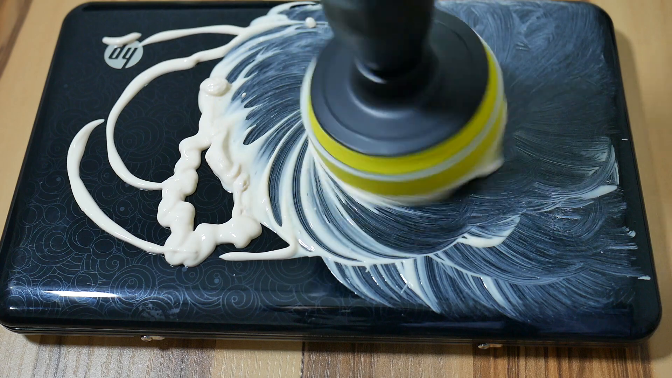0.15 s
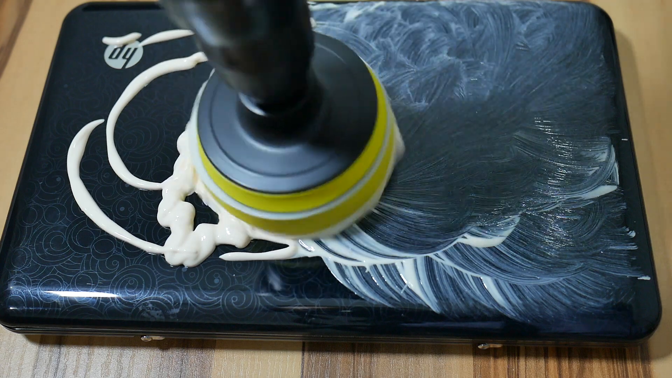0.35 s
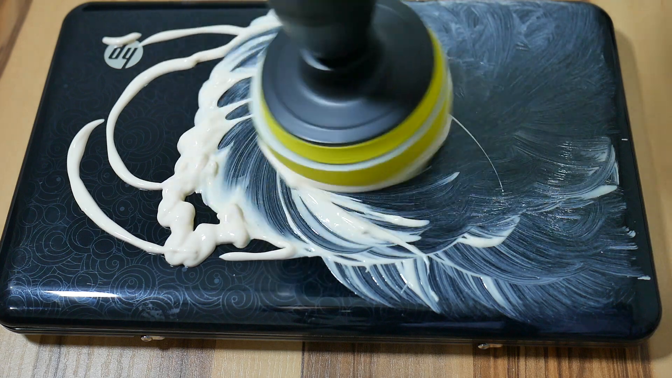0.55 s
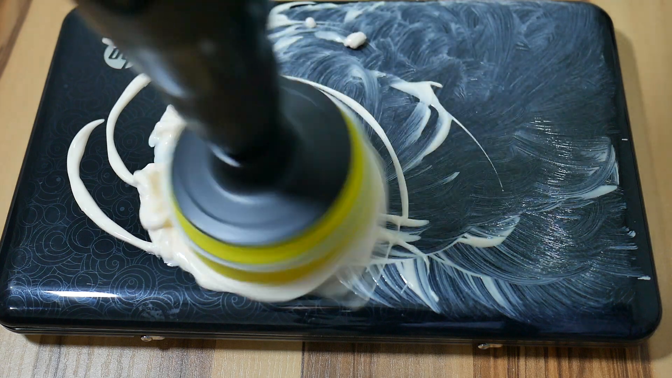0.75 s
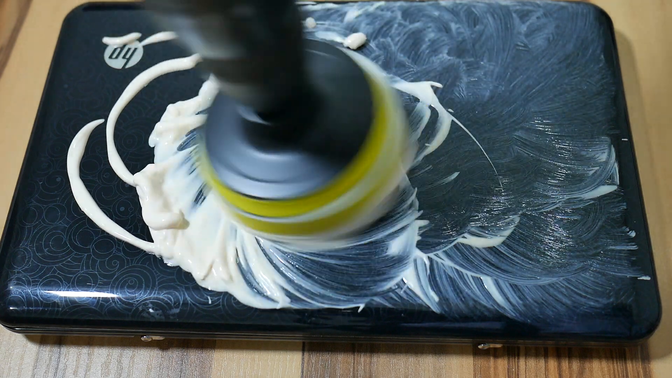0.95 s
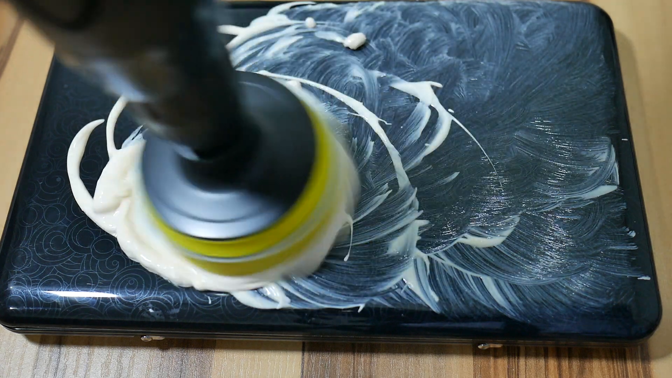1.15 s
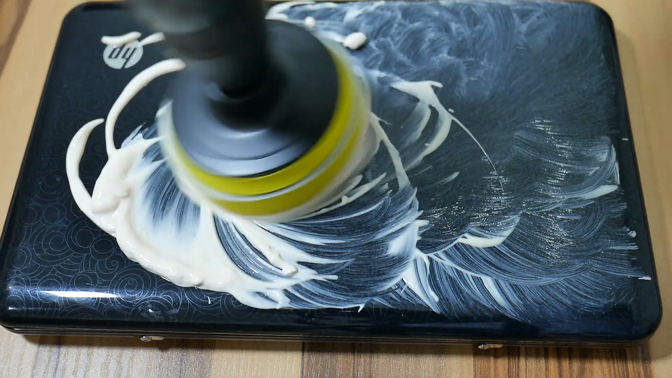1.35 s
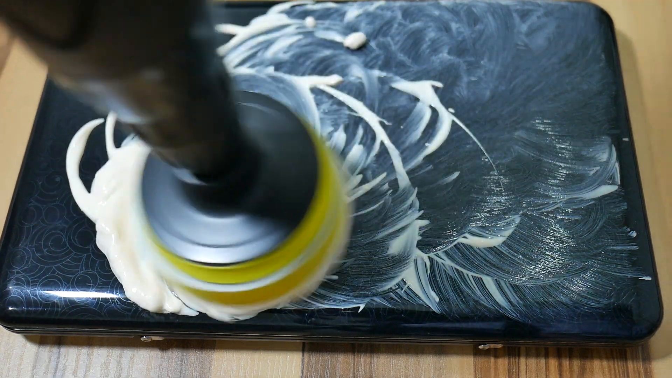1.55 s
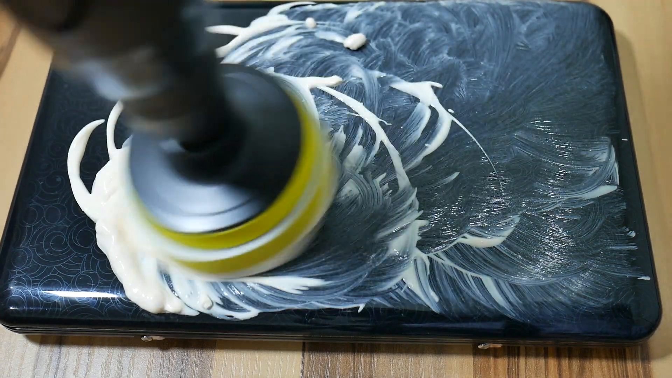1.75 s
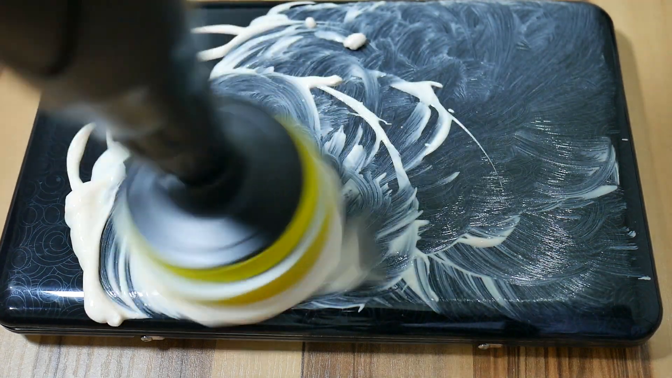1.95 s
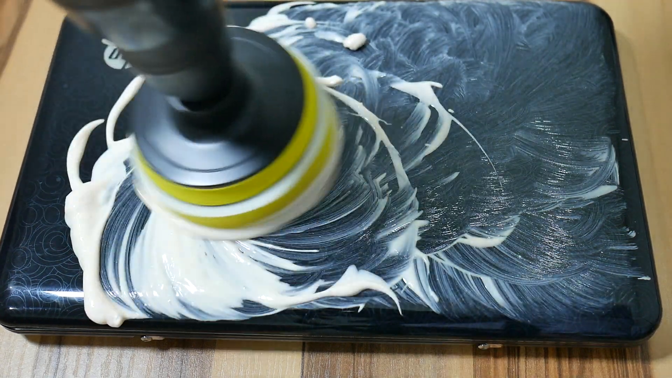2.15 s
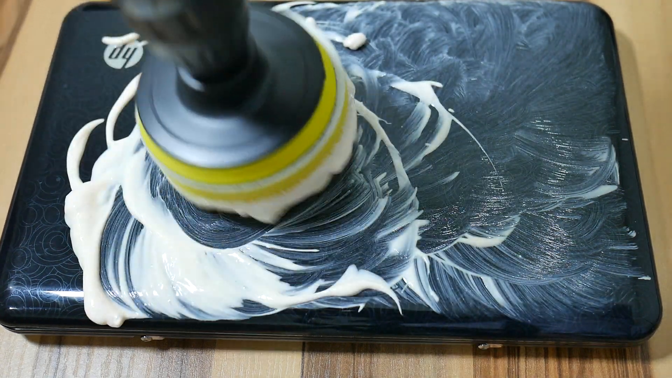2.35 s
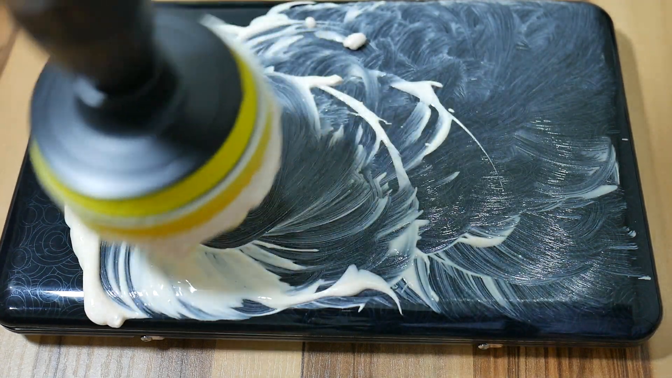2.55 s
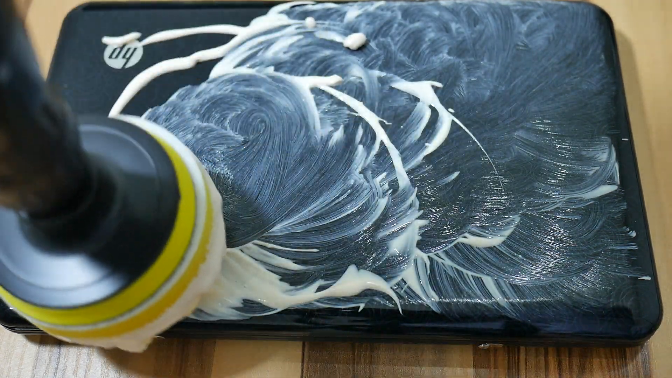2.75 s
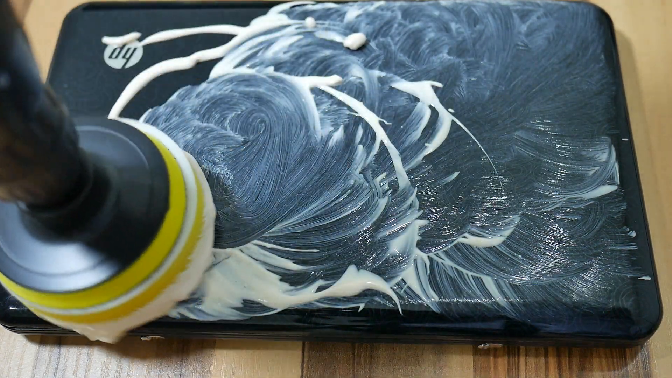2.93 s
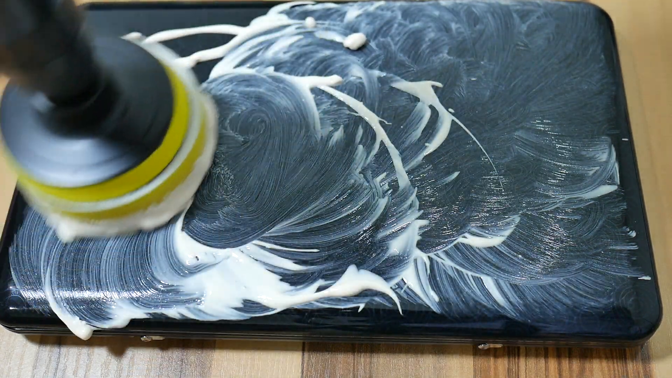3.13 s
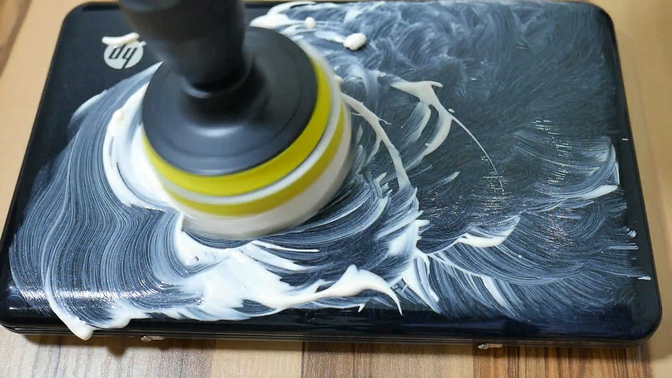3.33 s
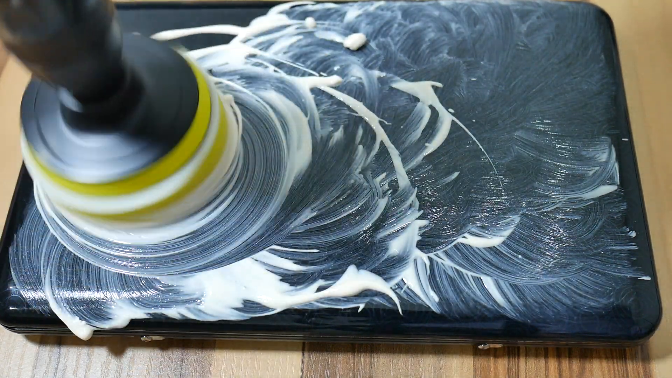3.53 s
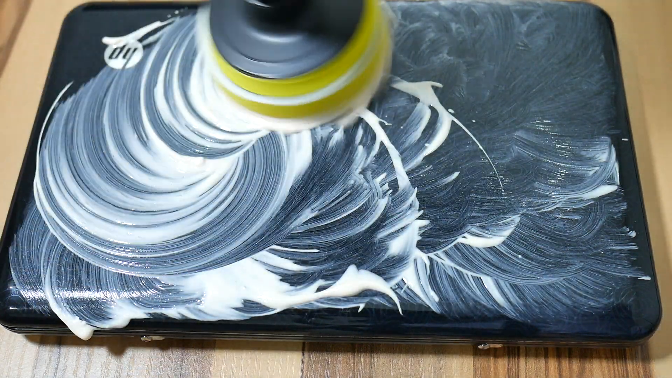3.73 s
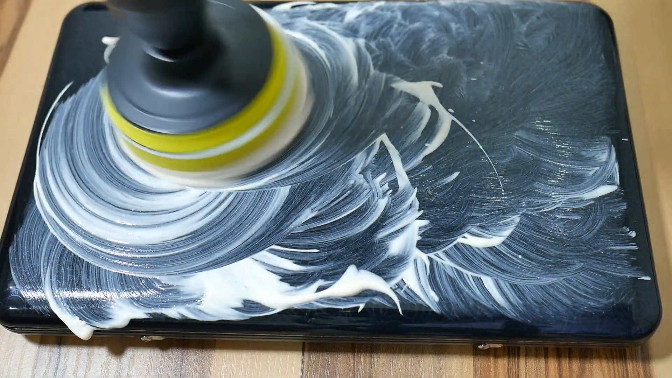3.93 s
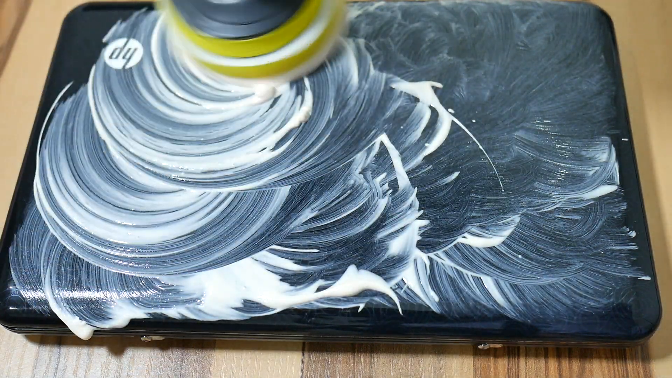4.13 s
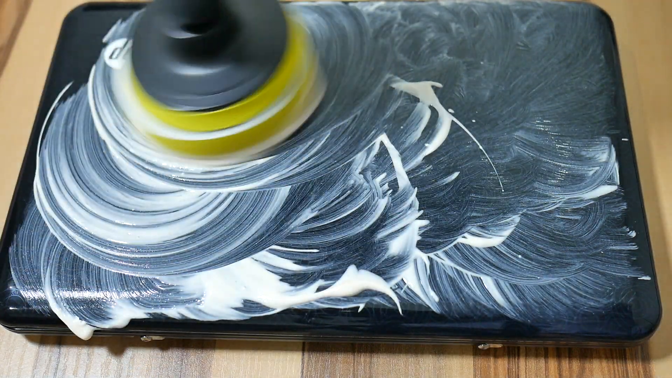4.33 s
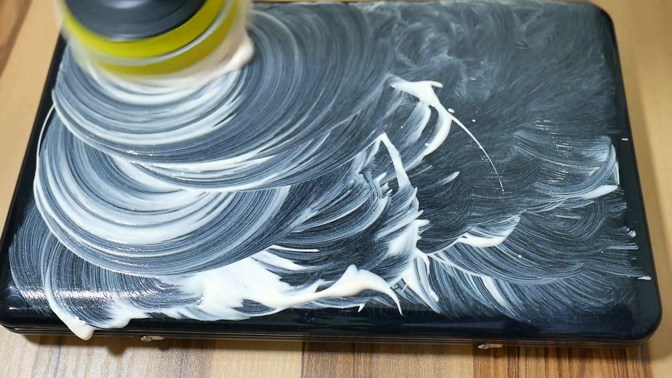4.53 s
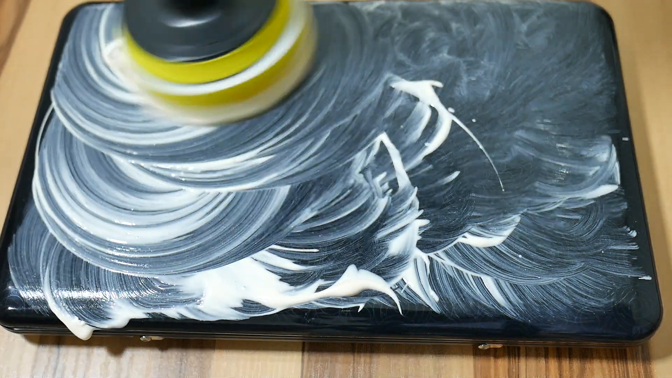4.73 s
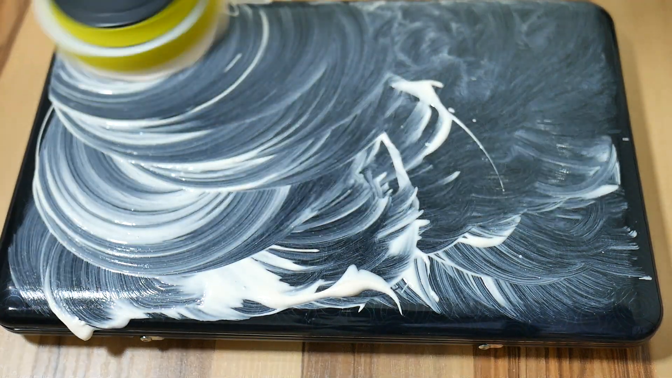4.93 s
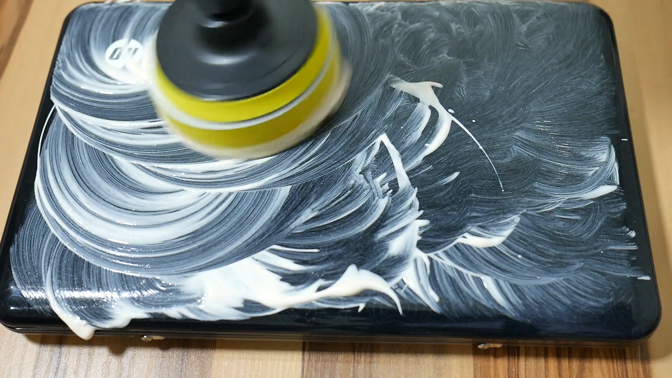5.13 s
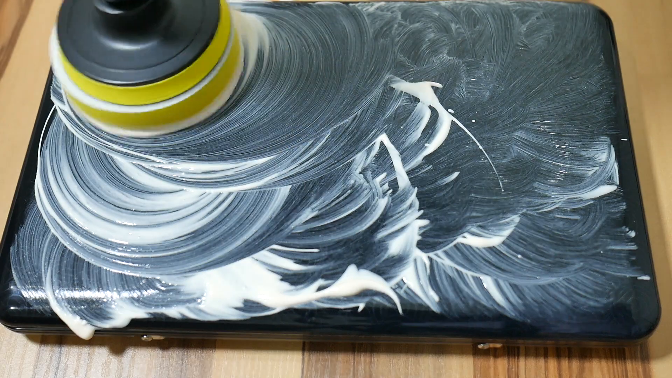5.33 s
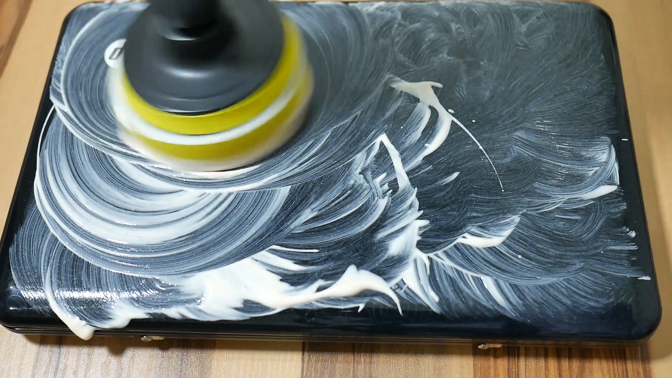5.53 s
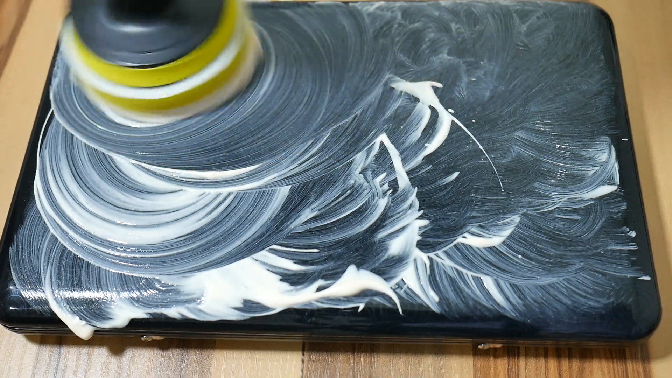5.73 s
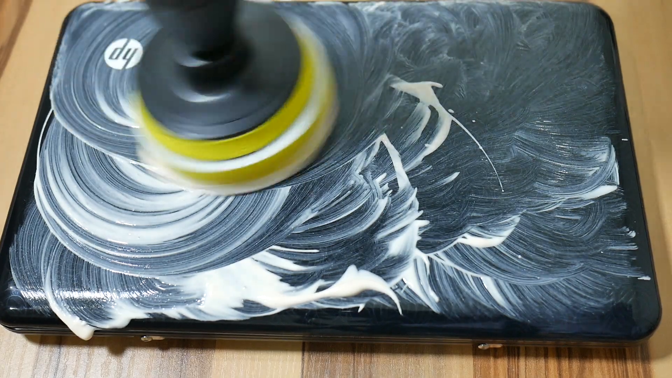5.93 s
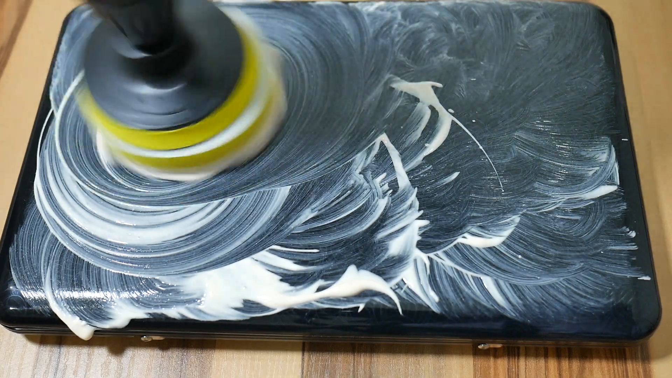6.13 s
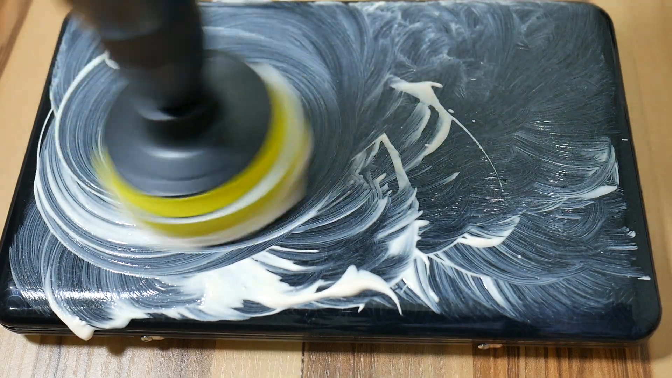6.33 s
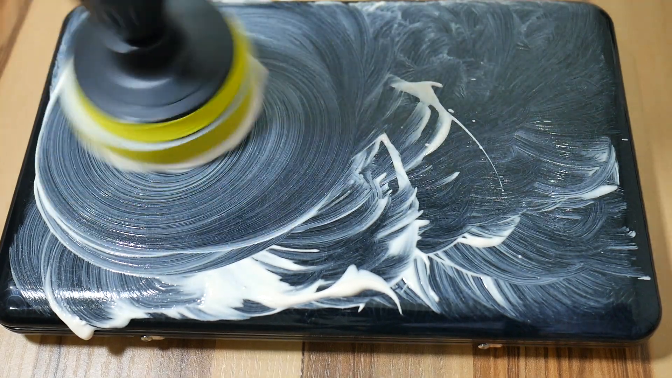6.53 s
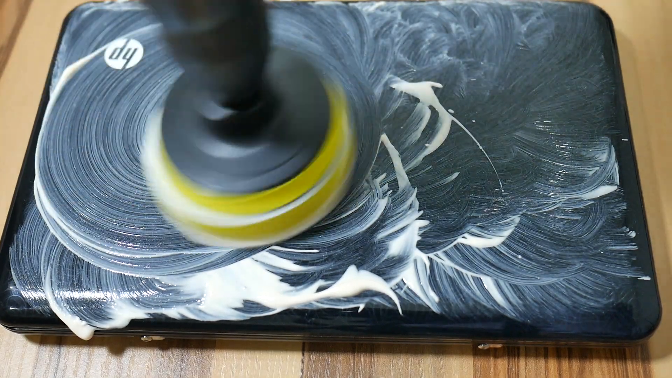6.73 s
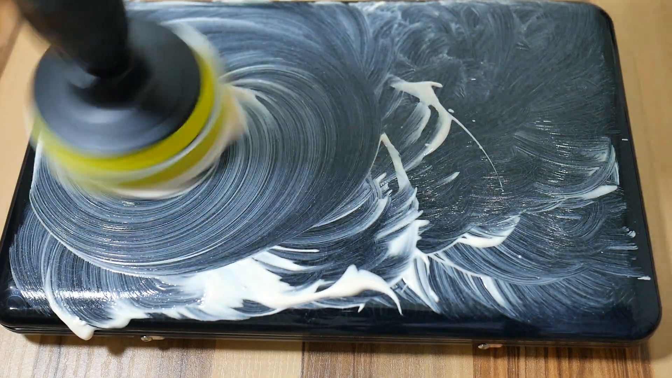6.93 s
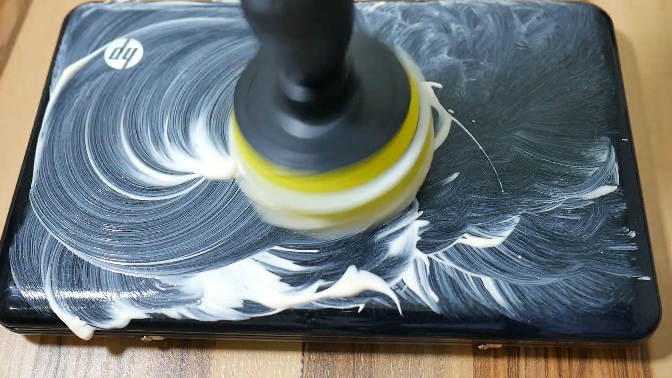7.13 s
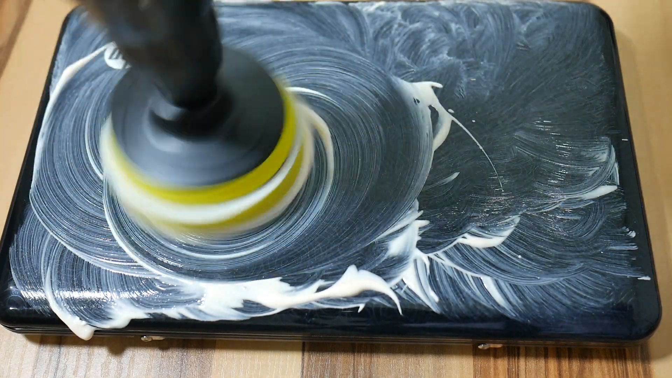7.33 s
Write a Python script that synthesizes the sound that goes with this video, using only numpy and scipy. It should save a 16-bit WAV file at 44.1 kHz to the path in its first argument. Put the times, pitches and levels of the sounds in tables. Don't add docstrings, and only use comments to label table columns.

```python
import sys
import numpy as np
from scipy import signal
from scipy.fft import rfft, irfft, next_fast_len
from scipy.io import wavfile
from scipy.ndimage import uniform_filter1d

SR = 44100
rng = np.random.default_rng(int(sys.argv[2]) if len(sys.argv) > 2 else 0)


def gain_from_db(level_db):
    decades = np.asarray(level_db, float) / 20
    return 10 ** decades


def log_audio(samples):
    frames = np.atleast_2d(samples).T
    limited = np.clip(frames, -1, 1)
    pcm = np.round(limited * 32767).astype(np.int16)
    wavfile.write(sys.argv[1], SR, pcm)


N = 329868
TIME = np.arange(N) / SR
CARRIER, ROTOR = 0.046, 0.26
REGRIP_S = 2.8

# start_s, tooth_rate_hz, lag_s, grind_db
TRIGGER_MOVES = [(0, 969.3, 0.11, -36.5), (.182, 790, .02, -40.5), (.23, 746.3, 0.048, -38),
                 (.576, 967, .025, -36), (.98, 837.7, 0.023, -37.5), (1.04, 738.3, 0.093, -35.5),
                 (2.24, 550, 0.036, -36.5), (2.364, 299, 0.039, -49), (2.445, 229.5, 0.18, -88),
                 (2.965, 219.6, 0.019, -53.5), (3.1, 205.6, 0.074, -78), (3.222, 300.3, 0.022, -45),
                 (3.25, 320.8, 0.024, -36.5), (3.268, 600.8, .03, -28.5), (3.29, 1120, .028, -30.5),
                 (3.4, 1095, 0.059, -30.5), (3.8, 1082, 0.19, -31.5), (4.5, 1081, 0.066, -34.5),
                 (5.125, 957.6, 0.047, -34), (5.2, 740, 0.037, -39.5), (6.445, 537, .025, -37),
                 (6.703, 947, 0.03, -33.5), (6.805, 1056, .022, -37.5), (7.0, 1084, 0.048, -38),
                 (7.24, 1042, 0.04, -38.5), (7.3, 928, 0.032, -36)]
# centre_s, grind_gain_db, half_length_s
LEANS = [(0.225, 3, 0.041), (0.447, 2.5, 0.084), (0.605, 3, 0.053), (1.101, 2.5, 0.087),
         (1.265, -2.5, 0.05), (1.61, 1.5, 0.076), (1.878, 3, 0.1), (2.224, 4, 0.065), (2.437, 6, 0.0092),
         (3.091, 5, 0.022), (3.309, 6, 0.04), (3.609, 1.5, 0.094), (4.4, 1.5, .12), (4.88, 2, 0.075),
         (5.229, 5, 0.029), (5.38, 5.5, 0.12), (5.679, 5.5, .12), (6.123, 5.5, 0.15), (6.375, 3.5, 0.069),
         (6.472, 5, 0.045), (6.888, 3.5, 0.096), (7.3, 3.5, 0.064)]
# start_s, second_db, third_db, fourth_db, higher_db
MESH = [(0, -2.5, -6, -2.5, -1), (.168, -7, -2, -26, -1), (.2, -16.5, 5.5, -7, -0.5),
        (.26, -12.5, -1, -4, -2.5), (.575, -10, -9, -11, -5.5), (.64, -6.5, -11, -2.5, 0),
        (.85, -5.5, -10.5, -8, -3), (.995, -20, -0.5, -10, -3.5), (1.24, -15.5, -2, -12, -7.5),
        (1.66, -15, -8, -8.5, -7.5), (1.98, -9, -3, -17.5, -4), (2.215, -39, -32, -9, -35),
        (2.39, -38, -36.5, -39, -48), (3.26, -6, -10, -20, -30), (3.303, -4, -19, -13, -23),
        (3.369, -16, -9, -5, -22), (3.48, -5.5, -6, -3, -19), (4.6, -6, -6, -28.5, -15),
        (4.96, -1.5, -14, -19, -6), (5.129, -3.5, -26.5, -24, -1.5), (5.205, -6, 1, -9, -23),
        (5.28, -12, -10.5, -5.5, -12), (6.435, -26, -22, -19, -7.5), (6.52, -21, -21, -7, -4),
        (6.72, -8, -21, -18, -6), (6.845, -6, 1.5, -3, -7), (7.125, 3, -6, -5, -20),
        (7.23, -8, 0.5, -7, -13), (7.305, -16, -13, 0, -14), (7.39, -9, -5, -6, -15)]
# multiple_of_tooth_rate, level_db, sideband_depth_0_to_1
TEETH = [
    [(2, 0, 0.54)],
    [(3, 0, 0.3)],
    [(3.82, -9.5, 0), (4, -14, 1)],
    [(5, 4, 0.34), (6, 2, 0.5), (7, -1, 0.3), (8, -3, 0.56)],
]
# centre_hz, width_hz, level_db
FIRST_GRIP = [(1322, 53, -18.5), (2100, 70, 6.5), (2250, 120, 5), (2940, 160, -22), (4090, 210, 9.5),
              (4360, 314, -25), (4940, 510, 5.5), (5300, 200, -8), (7100, 1600, -8)]
# centre_hz, width_hz, level_db
SECOND_GRIP = [(1305.7, 200, -3), (1769.3, 200, 5.5), (2049.3, 200, 7.5), (2870, 600, -2), (3400, 370, 1),
               (3418, 192, 0), (4150, 380, 3.5), (4220, 330, 3.5), (5470, 820, 7.5), (7260, 349, 8)]
# frequency_hz, level_db
GRIND_SPECTRUM = [(130, -71.5), (220, -25.5), (340, -17), (491, -17.5), (581, -9), (642, -21.5), (698, -10),
                  (1250, -9.5), (2180, -4), (2490, 0), (4250, -4), (6250, -9.5), (12000, -32.5),
                  (15600, -47), (22000, -120)]
# frequency_hz, level_db_per_hz
HISS_SPECTRUM = [(2940, -55.5), (5000, -11), (7380, -3.5), (8740, -10.5), (12200, -8.5), (15100, -2.5),
                 (15800, -2.5)]
# centre_hz, width_hz, level_db
COWL = [(6000, 1800, 4.5), (7170, 1000, 0), (8550, 1900, 6.5), (9570, 500, 1), (10600, 1000, 6),
        (11730, 780, 3.5), (13400, 1800, 1)]
# multiple_of_tooth_rate, level_db
SHAFTS = [(.322, -26.5), (.523, -32), (.805, -26), (1.026, -22), (1.33, -24), (1.61, -22), (2.67, -46),
          (3.58, -11), (7.62, -19), (11.2, -27)]
# start_s, end_s, multiple_of_tooth_rate,
# over_grind_db
SINGS = [(0.435, 0.547, .805, -13.5), (0.954, 1.066, 5, -7.5), (6.845, 7.319, 4, 1.5), (1.0, 1.125, 3, 2),
         (1.0, 1.086, 4, -5), (1.068, 1.15, 6, -5), (1.09, 1.196, 2, -10), (1.147, 1.222, 3, -2),
         (1.905, 2.256, 2, -16.5), (2.148, 2.279, 3.58, -18.5), (6.882, 7.5, .954, -15),
         (2.215, 2.281, 3, -5), (2.278, 2.332, 4, 0), (2.28, 2.36, 3, -5), (3.274, 3.308, 4, -1),
         (3.31, 3.376, 2, -5), (3.318, 3.335, 4, -2), (3.336, 3.416, 3.82, 0), (5.2, 5.281, 3, -17),
         (5.453, 5.62, 2, -4.5), (5.599, 5.696, 3, 0), (5.88, 6.074, 2, -5), (6.108, 6.251, 6, 2.5),
         (6.25, 6.441, 2, -7), (6.299, 6.457, 4, 1.5), (6.428, 6.458, 4.9, 2), (6.452, 6.477, 4, 1),
         (6.49, 6.711, 3, -7.5), (6.557, 6.629, 3.55, 3), (6.56, 6.62, 3.8, -2), (6.565, 6.69, 6, -1),
         (6.557, 6.624, 7.63, 3), (6.56, 6.686, 8, -3), (6.727, 6.86, 2, -1), (6.739, 6.81, 4, -6),
         (6.798, 6.857, 3.58, -2), (6.849, 7.197, 3, -5), (3.306, 3.33, .954, -0.5),
         (6.72, 6.897, .954, -18), (3.739, 3.947, 3, -6), (4.33, 4.619, 3, -3.5), (4.781, 4.957, 3, 1.5),
         (3.549, 4.61, 4, -14), (5.3, 5.49, 6, -7), (5.302, 5.488, 4, -1), (5.57, 5.807, 3.82, 2),
         (5.572, 5.8, 5, -3.5), (5.6, 5.819, 6, 0), (5.969, 6.267, 3.82, 2), (6, 6.269, 5, -3),
         (0.266, .3, 7, -10), (.34, 0.435, 7, -4), (1.203, 2.2, .805, -19), (1.3, 1.56, 7, -6),
         (1.731, 2.202, 7, -3.5), (3.45, 5.15, .322, -32.5), (3.45, 5.1, .523, -29.5),
         (4.601, 5.101, 3.58, -15), (4.649, 5.1, 5, -9), (5.28, 5.499, 5, -2), (5.28, 5.34, 7, 0),
         (5.582, 5.722, 7, -6), (1.247, 1.75, 3, -6), (5.557, 5.8, 4.9, -5.5), (5.6, 5.78, 4, -4.5),
         (5.8, 5.98, 4, -6), (5.9, 6.45, 5, -7.5), (6.02, 6.199, 7, -5), (6.083, 6.25, 4.9, -5.5),
         (6.23, 6.42, 3, -6), (6.848, 6.931, 3, 1), (7.4, 7.493, 2, -4), (6.8, 7.0, .523, -20.5),
         (7.001, 7.3, 3.58, -4), (7.126, 7.23, 2, -18), (7.3, 7.498, 5, -3), (7.339, 7.5, 3.58, -4)]
# start_s, end_s, centre_hz, width_hz, over_grind_db
VENTS = [(0.01, .2, 7600, 300, -20), (0.574, 1.03, 7540, 300, -18), (0.591, 0.998, 6780, 120, -26),
         (.58, .76, 10600, 2200, -15), (0.907, 1.048, 10800, 1800, -13), (1.054, 1.36, 6900, 120, -17),
         (1.36, 1.45, 10000, 3000, -14), (1.599, 2.298, 6705, 100, -17), (1.72, 1.92, 10490, 2500, -19.5),
         (1.302, 2.28, 5600, 250.2, -17.5), (3.452, 5.12, 8200, 140.6, -23), (3.45, 4.45, 12300, 450, -16),
         (3.505, 4.45, 9500, 499.6, -19.5), (4.398, 5.4, 7237, 299, -15.5),
         (4.604, 5.15, 12700, 400.2, -19), (4.503, 5.2, 9600, 1800, -14), (5.302, 5.45, 9900, 498, -18),
         (5.547, 5.716, 7260, 229.8, -14.5), (5.558, 5.66, 9500, 80, -15), (5.59, 5.75, 10700, 699.5, -15),
         (5.98, 6.12, 10000, 2000, -14), (5.994, 6.5, 7270, 249.8, -20), (6.35, 6.458, 10500, 1202, -15),
         (6.747, 7.12, 7430, 90, -17), (6.74, 6.9, 10500, 2507, -13), (6.816, 7.3, 12000, 350, -14),
         (7.198, 7.4, 10400, 1502, -15)]
# start_s, peak_db, low_hz, high_hz, t60_s
CLICKS = [(.965, -48, 279.5, 420, .12), (2.345, -49, 200, 709, 0.031), (2.46, -46, 499.6, 1290, .02),
          (2.426, -45, 1000, 13080, 0.016), (2.434, -34, 897, 5430, 0.034),
          (2.437, -32.5, 895, 12600, 0.035), (2.443, -47, 900, 5400, .03), (2.498, -43, 1107, 2200, 0.018),
          (2.835, -77, 890, 4000, .015), (2.855, -64, 706, 2510, 0.017), (2.891, -40.5, 600, 12100, 0.014),
          (2.933, -41, 2180, 6000, 0.018), (2.938, -39, 1490, 6160, 0.012), (2.945, -47, 1480, 5470, .015),
          (2.975, -43.5, 700, 2500, 0.029), (2.995, -41, 985, 7000, 0.0055), (3.044, -41, 890, 6000, 0.017),
          (3.074, -54, 894, 6000, 0.021), (3.087, -41, 877, 11960, 0.0099),
          (3.159, -41.5, 704, 3440, 0.014), (3.1605, -55, 3005, 15000, 0.0068),
          (3.2321, -32, 897, 5470, 0.015), (3.2461, -32, 900, 9090, 0.013), (3.254, -54, 1213, 4800, .04)]
# start_s, end_s
CHOPPER = [
    (2.976, 3.095),
    (3.234, 3.25),
]
# pitch_hz, level_db
CREEP_RINGS = [(1028, -60.5), (1750, -66), (2024, -61), (2762, -65), (4048, -65), (4404, -67), (5421, -71)]
# frequency_hz, level_db_per_hz
FLOOR_SPECTRUM = [(15, -64), (25, -35), (50, -17), (79, -23), (118, -11), (176, -17), (415, -14.5),
                  (450, -21), (529, -18), (1400, -31.5), (4000, -37), (7000, -37), (11000, -38.5),
                  (15000, -52.5)]
# pitch_hz, level_db
HUM = [(55, -100.5), (119.5, -79.5), (452, -86), (888, -93)]
# time_s, left_over_right_db
PAN = [
    (0.0, -0.5),
    (1.48, 1.5),
    (5.31, 0),
    (6.9, 0),
    (7.48, -1),
]
# frequency_hz, likeness_0_to_1
LIKENESS = [(30, 0.3), (100, 0.49), (500, 0.97), (2000, 0.92), (4000, 1), (8000, 0.99), (15000, 0.87)]
# frequency_hz, left_over_right_db
PORT_TILT = [(60, 0.5), (180, 2), (550, -1.5), (1000, 0.5), (1900, 1.5), (4970, 3), (15000, 0)]


def rms_one(x):
    return x / np.sqrt(np.mean(x ** 2) + 1e-20)


def at_hz(points, hz):
    table_hz, values = np.transpose(points)
    return np.interp(np.log(hz), np.log(table_hz), values)


def drift(rate):
    r = np.exp(-40 * np.pi * rate / SR)
    sparse = rng.standard_normal(N // 20 + 4002)
    slow = signal.lfilter([1], [1, -2 * r, r * r], sparse)[4000:]
    return np.interp(np.arange(N) / 20, np.arange(len(slow)), rms_one(slow))


def pair_noise():
    return rng.standard_normal((2, N))


def delayed(x, late):
    return np.array([np.interp(late, np.arange(N), side) for side in x])


def resonances(modes, hz, valley_db):
    peaks = sum(gain_from_db(2 * db) / (1 + (2 * (hz - f) / width_hz) ** 2) for f, width_hz, db in modes)
    return np.sqrt(peaks + gain_from_db(2 * valley_db))


def coloured(source, gain):
    hz = np.fft.rfftfreq(N, 1 / SR) + 1e-3
    alike = np.clip(at_hz(LIKENESS, hz), 0, 1)
    mid, side = irfft(rfft(source) * gain(hz) * np.sqrt([1 + alike, 1 - alike]), N)
    return rms_one(np.array([mid + side, mid - side]))


def gliding(rate_hz):
    change = np.abs(uniform_filter1d(np.gradient(rate_hz), size=2000)) * SR
    return change / (change + 900)


def loaded(rate_hz):
    return np.clip(rate_hz / 50 - 6, 0, 1)


def faded(start_s, end_s, fade_s):
    part = slice(int(start_s * SR), int(end_s * SR))
    t = TIME[part]
    return part, np.clip(np.minimum(t - start_s, end_s - t) / fade_s, 0, 1)


def settle(starts, lags, values):
    t = np.arange(N // 16 + 1) * 16 / SR
    out = np.outer(values[0], np.ones(len(t)))
    for s, lag, step in zip(starts[1:], lags[1:], np.diff(values, axis=0)):
        out = out + np.outer(step, 1 - np.exp(-np.maximum(t - s, 0) / lag))
    return [np.interp(TIME, t, column) for column in out]


def controls():
    trigger, mesh = np.array(TRIGGER_MOVES), np.array(MESH)
    rate_hz, grind_db = settle(trigger[:, 0], trigger[:, 2], trigger[:, [1, 3]])
    lean_db = sum(db * np.exp(-np.abs((TIME - s) / spread) ** 2.55) for s, db, spread in LEANS)
    inertia_s, sag_hz_per_db = 0.009, 4.5
    rate_hz = uniform_filter1d(rate_hz, size=int(inertia_s * SR), mode="nearest")
    rate_hz = rate_hz - sag_hz_per_db * lean_db
    grind_db = grind_db + lean_db
    bite = [-1.2, 0.27, 0.038, 1]
    mesh_lag_s = np.full(len(mesh), 0.0036)
    groups_db = settle(mesh[:, 0], mesh_lag_s, mesh[:, 1:]) + grind_db + np.outer(bite, lean_db)

    speeding_up = uniform_filter1d(1.0 * (np.gradient(rate_hz) > 0), size=900)
    pull_db = np.where(TIME < REGRIP_S, 8.5, 7) * gliding(rate_hz) * speeding_up
    regrip_db = -6.5 * rate_hz / 1000 * (TIME > REGRIP_S)
    dying_db = np.maximum(668 - rate_hz, 0) / 3.1
    tone_db = grind_db - 16 + regrip_db + pull_db - dying_db
    hiss_db = -5 + 4.5 * np.log2(rate_hz / 1000)
    return rate_hz, tone_db, groups_db, grind_db, hiss_db


def whine(turns, rate_hz, tone_db, groups_db):
    out, slack = np.zeros((2, N)), gliding(rate_hz)
    coarse_s = TIME[::64]
    for group, group_db in zip(TEETH, groups_db):
        waves, power = 0, 0
        for multiple, db, depth in group:
            hz = multiple * rate_hz[::64]
            first, second = resonances(FIRST_GRIP, hz, -68), resonances(SECOND_GRIP, hz, -39)
            body = np.where(coarse_s < REGRIP_S, first, second)
            gain = np.interp(TIME, coarse_s, gain_from_db(db) * body)
            fading = gain_from_db(1.0 * drift(7.5))
            planet_phase = 2 * np.pi * (CARRIER * turns + rng.random()) + 2.25 * drift(9.2)
            planets = depth * np.cos(planet_phase)
            uneven = 0.5 * (drift(8.8 * multiple) + 1j * drift(6.8 * multiple))
            loose = gain_from_db(-1.6 * multiple * slack ** 3)
            wave = gain * fading * loose * (1 + 2 * planets + uneven)
            wave = wave * np.exp(2j * np.pi * multiple * turns)
            skew = 0.12 * (drift(0.99) + 1j * drift(3.1))
            waves = waves + np.real([wave * (1 + skew), wave * (1 - skew)])
            power = power + gain ** 2 * (0.81 + depth ** 2)
        out += gain_from_db(group_db) * waves / np.sqrt(power)
    ring_phase = 2 * np.pi * (1 - CARRIER) * turns + 0.52 * drift(25)
    ring_gear = np.sqrt(2) * np.sin(ring_phase) * gain_from_db(1.64 * drift(30) + 1.95 * drift(3.8))
    return (out + gain_from_db(tone_db + 4.0) * ring_gear) * loaded(rate_hz)


def grind(turns, grind_db, hiss_db):
    pulses = [(1, 0.35), (ROTOR, 0.2), (CARRIER, 0.1), (CARRIER / 3.7, 0.12)]
    beat = sum(depth * np.cos(2 * np.pi * k * turns) for k, depth in pulses)
    rattle = pair_noise() * (1 + beat) * gain_from_db(0.45 * drift(16.7))

    def notch(hz):
        return 1 - 0.65 / (1 + (2 * (hz - 7900) / 220) ** 2)

    def rolling(grip):
        return coloured(rattle, lambda hz: gain_from_db(at_hz(GRIND_SPECTRUM, hz)) * resonances(grip, hz, 0.76) * notch(hz))

    rolled = np.where(TIME < REGRIP_S, rolling(FIRST_GRIP), rolling(SECOND_GRIP))
    sparks = (1 + 0.5 * beat) * gain_from_db(0.71 * drift(90))
    hiss = 0
    for mode in COWL:
        swell = gain_from_db(mode[2] + 2.0 * drift(1.9))
        hiss = hiss + swell * coloured(
            sparks * pair_noise(),
            lambda hz: gain_from_db(at_hz(HISS_SPECTRUM, hz)) * notch(hz) * resonances([mode], hz, -47))
    for extra_ms, sway_hz in [(1.7, 0.43), (2.9, 0.71)]:
        sway = 1 + 0.012 * np.sin(2 * np.pi * sway_hz * TIME)
        late = np.arange(N) - extra_ms * sway * SR / 1000
        hiss = hiss + gain_from_db(-7) * delayed(hiss, late)
    return gain_from_db(grind_db) * (rolled + gain_from_db(hiss_db + 0.5) * rms_one(hiss))


def shafts(turns, rate_hz, grind_db):
    tones = 0
    for k, db in SHAFTS:
        hz = k * rate_hz
        radiated = hz ** 4 / (hz ** 4 + 373.0 ** 4)
        level = gain_from_db(db + 3.0 * drift(2.6))
        flutter = min(0.6 * k, 0.6) * (drift(4.0 + 22 * k) + 1j * drift(4.0 + 22 * k))
        tones = tones + radiated * level * np.real((1 + flutter) * np.exp(2j * np.pi * k * turns))
    return tones * gain_from_db(grind_db) * (1 - gliding(rate_hz)) * loaded(rate_hz) * (rate_hz / 900) ** 1.36


def lid_echo(x):
    extra_ms = 0.711 + 0.06 * drift(0.33) + 0.068 * drift(2.35)
    late = np.arange(N) - extra_ms * SR / 1000
    bounce_db = -12
    return (x + gain_from_db(bounce_db) * delayed(x, late)) / np.sqrt(1 + gain_from_db(2 * bounce_db))


def room(x):
    t60_s, wall_cut_hz = 0.33, 1800
    size = next_fast_len(N + SR)
    w = 2 * np.pi * np.fft.rfftfreq(size)
    dull = 1 / (1 + 1j * w * SR / (2 * np.pi * wall_cut_hz)) ** 0.5
    response = np.zeros((2, len(w)), complex)
    lags = (rng.uniform(0.015, 0.045, 16) * SR).astype(int)
    for k, lag in enumerate(lags):
        loop = gain_from_db(-60 * lag / SR / t60_s) * dull * np.exp(-1j * w * lag)
        response[k % 2] += loop / (1 - loop) * (-1) ** (k // 2)
    return irfft(rfft(x, size) * response, size)[:, :N]


def bench(grind_db):
    thrum = coloured(pair_noise(), lambda hz: resonances([(185.0, 27, 0)], hz, -59.5) ** 2)
    return gain_from_db(-79.5 + 0.11 * (grind_db + 33.5) + 3.5 * drift(1.4)) * thrum


def background():
    hum = sum(gain_from_db(db + 76.0 + 0.88 * drift(5.9)) * np.sin(2 * np.pi * hz * TIME) for hz, db in HUM)
    noise = coloured(pair_noise(), lambda hz: gain_from_db(at_hz(FLOOR_SPECTRUM, hz)))
    recover_s, recover_db_per_s, clamp_s = 1.83, 8.5, 3.3
    clamp = np.clip(1 - (TIME - clamp_s) / 0.0998, 0, 1)
    lift_db = recover_db_per_s * np.maximum(TIME - recover_s, 0) * clamp
    return gain_from_db(-75 + lift_db) * (noise * gain_from_db(-2.5) + hum)


def vents(grind_db):
    out = np.zeros(N)
    for start_s, end_s, centre_hz, width_hz, db in VENTS:
        part, fade = faded(start_s, end_s, 0.031)
        edges_hz = [centre_hz - width_hz / 2, centre_hz + width_hz / 2]
        band = signal.butter(1, edges_hz, "band", fs=SR, output="sos")
        noise = rng.standard_normal(len(fade))
        out[part] += gain_from_db(db) * fade * rms_one(signal.sosfilt(band, noise))
    return out * gain_from_db(grind_db + 4)


def singing(turns, grind_db):
    out, flutter = np.zeros(N), gain_from_db(grind_db + 1.94 * drift(45))
    wobble = 0.5 * drift(40)
    for start_s, end_s, multiple, db in SINGS:
        part, fade = faded(start_s, end_s, 0.0096)
        phase = 2 * np.pi * multiple * turns[part] + wobble[part] * np.sqrt(multiple)
        out[part] += gain_from_db(db) * fade * flutter[part] * np.sin(phase)
    return out


def clicks():
    out, t = np.zeros(N), np.arange(2500) / SR
    for start_s, db, low_hz, high_hz, t60_s in CLICKS:
        crack = rng.standard_normal(len(t))
        crack[0] = 3.7
        band = signal.butter(3, [low_hz, high_hz], "band", fs=SR, output="sos")
        burst = signal.sosfilt(band, crack * gain_from_db(-60 * t / t60_s))
        out[round(start_s * SR):][:len(t)] += gain_from_db(db) * burst / np.abs(burst).max()
    return out


def creep(rate_hz, grind_db):
    gate = sum(np.clip(np.minimum(TIME - on, off - TIME) / 0.00395, 0, 1) for on, off in CHOPPER)
    whistle = np.sqrt(2) * gain_from_db(-74 + 2.9 * drift(30)) * np.sin(2 * np.pi * 12020 * TIME)
    rings = 0
    for hz, db in CREEP_RINGS:
        shaking = drift(130) + 1j * drift(131)
        rings = rings + gain_from_db(db) * np.real(shaking * np.exp(2j * np.pi * hz * TIME))
    judder = coloured(pair_noise(), lambda hz: resonances([(1190, 710, 0.0018)], hz, -41.5) ** 2)
    slow = np.clip(8 - rate_hz / 50, 0, 1)
    return gate * (whistle + rings * gain_from_db(grind_db + 59.0)) + slow * judder * gain_from_db(grind_db - 3.5)


def scene():
    rate_hz, tone_db, groups_db, grind_db, hiss_db = controls()
    tremble = 0.00309 * drift(14.92) + 0.007 * gliding(rate_hz) * drift(69.03)
    turns = np.cumsum(rate_hz * (1 + tremble)) / SR
    drill = whine(turns, rate_hz, tone_db, groups_db) + grind(turns, grind_db, hiss_db)
    drill = drill + shafts(turns, rate_hz, grind_db) + creep(rate_hz, grind_db)
    drill = lid_echo(drill + singing(turns, grind_db)) + clicks()
    drill = signal.sosfilt(signal.butter(4, 120, "high", fs=SR, output="sos"), drill)
    pan_db = np.interp(TIME, *np.transpose(PAN))
    direct = drill * gain_from_db([pan_db / 2, -pan_db / 2])
    reverb = gain_from_db(-14.5) * room(drill.mean(axis=0))
    return direct + reverb + bench(grind_db) + background() + vents(grind_db)


def band_limit(x):
    return signal.sosfilt(signal.butter(12, 15720, fs=SR, output="sos"), x)


def record(dry):
    hz = np.fft.rfftfreq(N, 1 / SR) + 1e-3
    tilt_db = at_hz(PORT_TILT, hz) - np.mean(np.array(PORT_TILT)[:, 1])
    rounded = 0.63 * np.tanh(dry / 0.6)
    top_cut = 1 / (1 + (hz / 15550) ** 80)
    mix = irfft(rfft(rounded) * gain_from_db([tilt_db / 2, -tilt_db / 2]) * top_cut, N)
    return band_limit(mix)


dry = scene()
out = record(dry)
log_audio(out)
```